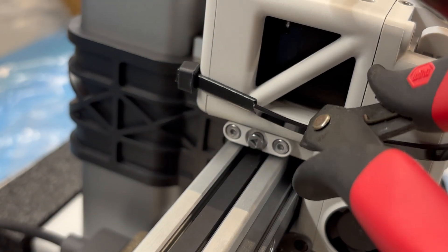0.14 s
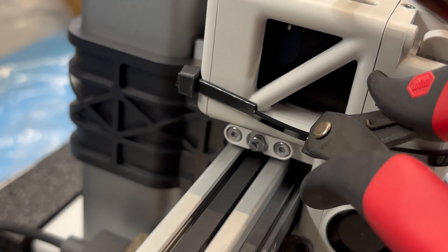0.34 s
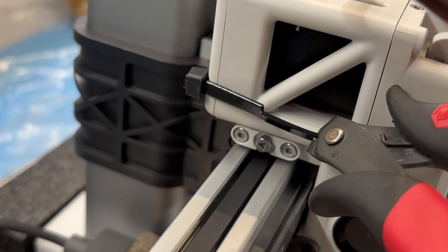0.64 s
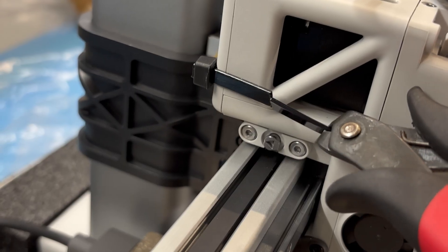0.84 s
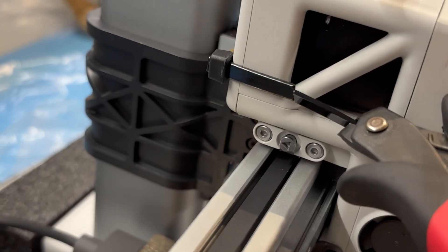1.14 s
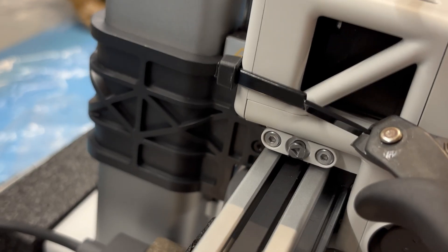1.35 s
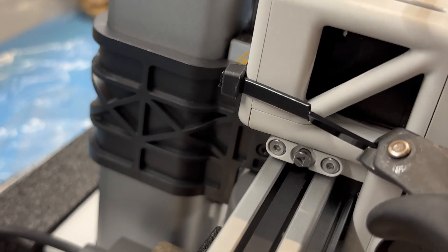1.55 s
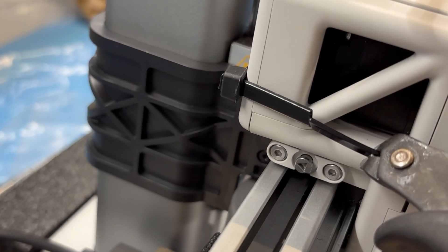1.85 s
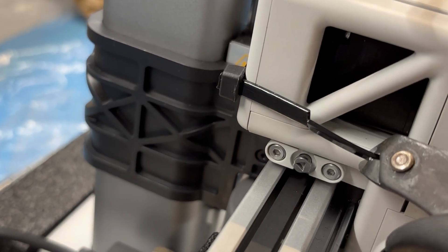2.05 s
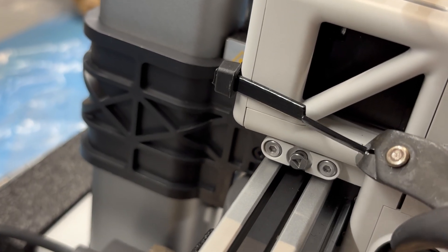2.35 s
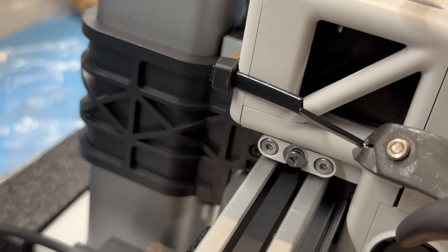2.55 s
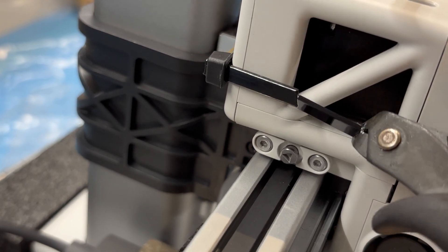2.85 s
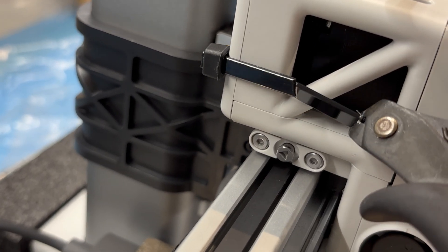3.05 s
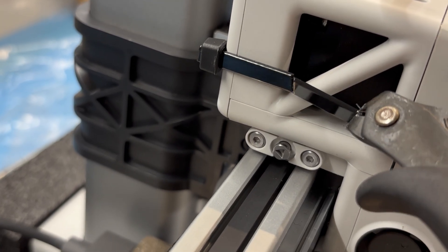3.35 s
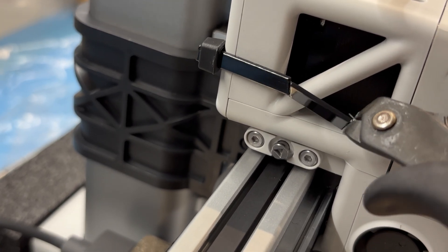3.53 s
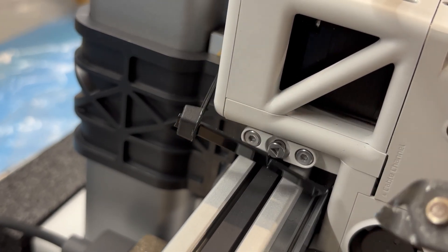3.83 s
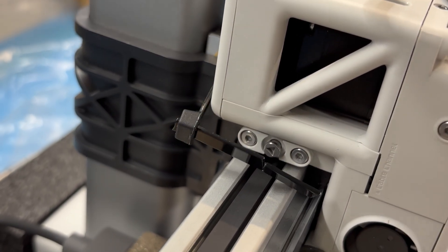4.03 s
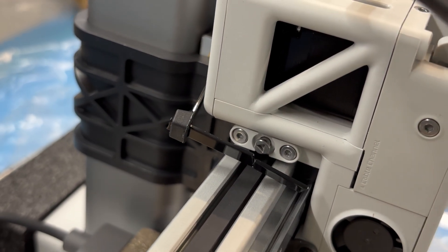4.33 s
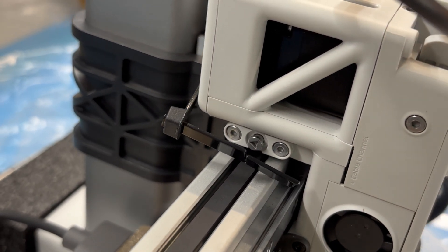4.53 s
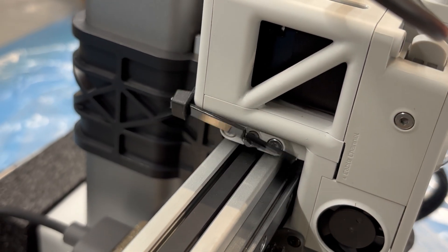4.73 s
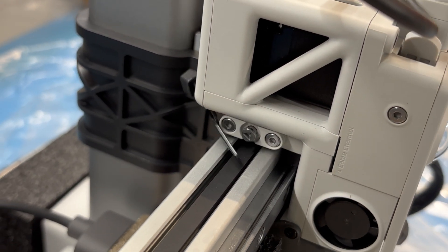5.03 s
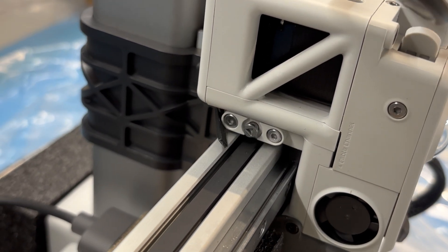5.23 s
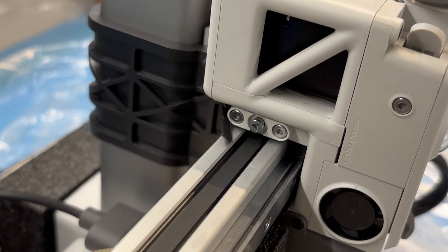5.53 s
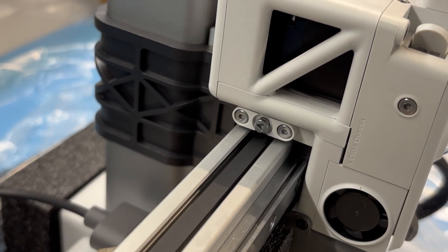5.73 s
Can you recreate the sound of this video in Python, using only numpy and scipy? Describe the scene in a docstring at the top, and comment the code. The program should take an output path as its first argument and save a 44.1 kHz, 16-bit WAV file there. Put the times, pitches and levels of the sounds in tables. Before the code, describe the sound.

A low, steady machine hum with faint fan noise and soft room air runs throughout, indoors and closely miked in stereo. In the first second the deep boom and dull wash of an earlier knock die away, with a faint click near 0.4. Soft rubbery glove rustles come and go, mostly until 2.3. At about 2.37 to 2.4 the cutters bite with a very loud, hard plastic crack, a tight burst of clicks and a short falling thump. A clear click follows at 2.75, then small creaky ticks from 3.0 to 3.3. At 3.57 a second sharp snap lets the tie loose, and it scrapes and rattles until about 3.95. After a quieter gap, light clicks and ticks cluster at 4.6 to 4.9, with a brief bright scrape around 5.0. From 5.5 to 5.8 a dense, loud clatter of snaps, gritty sliding and hollow knocks tails off into hum.

```python
"""A bench in a humming room: side cutters squeeze a nylon cable tie on a plastic frame until it snaps;
the loose tie ticks, scrapes and rattles over the frame and its rail. A rubber glove rustles and the boom
of an earlier knock dies away. Contacts are noise bursts through resonances, jolts are sagging sines,
rubs and slides are gated grainy noise, hum is shaped noise. A close phone microphone pair."""
import sys
import numpy as np
from scipy import signal
from scipy.fft import rfft, irfft, next_fast_len
from scipy.io import wavfile
from scipy.ndimage import map_coordinates

SR = 44100
rng = np.random.default_rng(int(sys.argv[2]) if len(sys.argv) > 2 else 0)


def bounce(signal):
    """Save signal as a 16-bit WAV file at the path given by the first command-line argument."""
    frames = np.transpose(np.atleast_2d(signal))
    limited = np.clip(frames, -1, 1)
    pcm = np.round(limited * 32767).astype(np.int16)
    wavfile.write(sys.argv[1], SR, pcm)


N = 259341

# Drone level: time_s, level_db
DRONE_LEVEL = [(0, -48.5), (.5, -50), (.8, -53), (1.3, -52.5), (1.62, -48), (1.72, -54.5), (2.3, -53.5),
               (2.4, -46), (2.57, -53), (3.3, -50.5), (3.62, -45), (3.88, -52.5), (4.47, -53.5),
               (4.73, -47), (4.85, -54), (5.88, -48)]
# Drone of far machines, relative spectrum: freq_hz, density_db
DRONE_SPECTRUM = [(12, -53), (20, -25), (30, -5.5), (49, -1.5), (65, 6.5), (92, -8), (134, -15.5),
                  (160, -15.5), (210, -47), (350, -120)]
# Narrow bands of fan noise, each resonance applied twice: center_hz, width_hz, gain_per_pass_db
FAN_BANDS = [(925, 140, -6.5), (1300, 120, -0.5), (2330, 390, -14)]
# Room air, relative spectrum: freq_hz, density_db
AIR_SPECTRUM = [(59, -24.5), (100, 3.5), (240, -6), (360, -18), (392, -15.5), (446, -15.5), (628, -18),
                (942, -24), (1030, -29), (1300, -27.5), (2260, -38), (5210, -54.5), (7020, -58),
                (12000, -58), (16500, -54.5)]
# Left-right likeness of air and wash: freq_hz, correlation
LIKENESS = [(60, 1), (130, 0.87), (290, 0.55), (640, 0.32), (1410, 0.041), (3100, 0.22), (6820, -0.011),
            (15000, -0.28)]
# Boom of the room mode, before the closing fade: time_s, level_db
BOOM_LEVEL = [(0, -67.5), (.04, -39.5), (.34, -41), (.42, -58), (.52, -40), (.58, -55), (.68, -46.5),
              (.8, -60), (1, -56)]
# Dull wash after the knock, relative spectrum: freq_hz, density_db
WASH_SPECTRUM = [(88, -33), (150, -8), (287, -31.5), (457, -11), (2540, -24.5), (5830, -35.5), (8000, -61),
                 (10400, -87), (17600, -120)]
# Glove rubs: start_s, length_s, hiss_db, change_over_rub_db, body_re_hiss_db
GLOVE_RUBS = [(0.561, 0.055, -75.5, -2, 4.5), (0.653, 0.28, -71, -7.5, -1.5), (0.981, 0.05, -67, -2, -4.5),
              (1.084, 0.19, -76, 9, 3), (1.357, 0.18, -71, -11.5, 0), (1.629, 0.11, -68.5, -5.5, -2.5),
              (1.808, 0.052, -75.5, 2.5, -8), (2.014, 0.063, -75.5, 8.5, -2), (2.13, 0.034, -67, -7.5, -10),
              (2.209, 0.03, -68, 1, -5), (2.3, 0.16, -86, 13, 8), (2.435, 0.085, -74.5, -13, 2),
              (2.794, 0.11, -74.5, -9, 4), (2.996, 0.11, -79.5, 0, 7), (3.273, 0.093, -77, -14, 3),
              (3.72, 0.039, -74, 5, -8), (3.88, 0.087, -83, 4, -1), (4.016, 0.067, -69, -13, 0),
              (4.205, 0.14, -78.5, 8.5, -4), (4.616, 0.06, -79.5, 8, 7), (5.18, 0.033, -81, -4, 11),
              (5.25, .18, -83, 0, 8), (5.472, 0.058, -73, 16, 1)]
# Rubber on handles, relative spectrum: freq_hz, density_db
RUBBER_SPECTRUM = [(1200, -29), (2000, -2), (3600, -8.5), (6200, 0), (8000, -4.5), (9500, 0.5),
                   (13500, -3.5), (15500, 1), (16500, -18.5)]
# Frame jolts: start_s, level_db, first_hz, last_hz, t60_s
FRAME_JOLTS = [(2.368, -28, 330, 69.4, 0.11), (3.566, -50, 450, 390, 0.064), (3.62, -52.5, 420, 390, 0.15),
               (5.596, -38, 400, 198, 0.058), (5.608, -33, 460, 333, .05), (5.65, -44.5, 400, 340, 0.12),
               (5.73, -41.5, 407, 347, 0.066)]
# Tie slides over the frame: start_s, length_s, level_db, change_over_slide_db, brightness_db
TIE_SLIDES = [(2.4, .12, -61.5, -23, 0), (2.751, 0.089, -66.5, -4, -3), (3.585, 0.16, -47, -15, 0),
              (3.755, 0.218, -70.5, 0.5, -4), (4.723, 0.16, -71.5, 12.5, 3), (4.949, 0.071, -57.5, 7, 8.5),
              (5.036, 0.058, -49.5, -5.5, 0), (5.459, .06, -66, 14, -3), (5.526, 0.037, -61.5, -10.5, -2),
              (5.586, 0.092, -45, -0.5, 6.5), (5.671, 0.17, -43, -21.5, -5)]
# Tie on frame, relative spectrum: freq_hz, density_db
SCRAPE_SPECTRUM = [(320, -39.5), (550, -4.5), (950, -4), (1170, -3), (1600, -9.5), (2350, -4.5), (3600, -9),
                   (4600, -11.5), (6500, -4.5), (8000, -31.5), (9750, -15), (12100, -22.5), (15600, -24),
                   (16500, -54)]
# Contacts: start_s, strap_peak_db, frame_re_strap_db, tick_re_strap_db, strap_hz, frame_hz, t60_s,
# left_minus_right_db (strap only)
CONTACTS = [(0.379, -54, -8, -15, 6350, 610, 0.022, 9.5), (0.4047, -68, 6, 13, 1700, 650, .031, 5),
            (1.8512, -74, -4, 28, 2010, 654, .015, 2), (2.3661, -18, -14.5, -10, 4402, 1030, 0.024, -1),
            (2.3791, -41.5, -8, 8.5, 1900, 596, .031, 12), (2.385, -21.5, -23.5, 9, 3300, 724, 0.0054, 9),
            (2.389, -23, -22, 7.5, 4900, 580, .0083, 13.5), (2.394, -4.5, -39, -3, 4574, 814, .012, -2),
            (2.4066, -39.5, -7, -5.5, 2570, 716, .016, 12.5),
            (2.4206, -44.5, -24, 0, 2320, 1335, .011, 6.5), (2.4615, -56, -12, 7, 2150, 622, 0.023, 2.5),
            (2.7492, -21.5, -20, -4, 4560, 750, 0.018, 1.5), (2.7647, -37, -5, -20, 2420, 1250, 0.029, -5),
            (2.7779, -41.5, 8.5, -25, 1920, 830, .051, 8), (3.0341, -40, 2, -23, 4500, 1190, .024, -0.5),
            (3.0514, -62, 12, -10, 3690, 1130, 0.065, -2), (3.0848, -38.5, -7.5, 0.5, 2130, 865, 0.024, 0),
            (3.2083, -62, -8, -14, 2090, 697, 0.019, -2), (3.24, -63.5, 12.5, -15.5, 3900, 1156, 0.025, -1),
            (3.2688, -55.5, 7.5, -5, 1790, 1065, 0.054, 2), (3.2915, -53.5, 10, 3, 1640, 1170, 0.045, 5),
            (3.4854, -57, -17.5, -30, 3700, 675, 0.017, -6),
            (3.5651, -15.5, -12, 1.5, 5230, 840, 0.035, 1.5), (3.5802, -24, -7.5, -13, 2580, 820, 0.04, 0),
            (3.6172, -33, 3, 15.5, 2416, 1233, .034, 15), (3.6291, -31, -6, -1, 3520, 1220, 0.078, 8),
            (3.6494, -36, 0.5, -2.5, 2110, 780, 0.077, -5.5), (3.6634, -37, -4, 9.5, 1840, 920, 0.018, 15),
            (3.6774, -37, -23, 10, 6160, 907, 0.022, 13), (3.6856, -42.5, -12, -3, 4070, 861, 0.011, 5),
            (3.7023, -34, -10.5, -4, 2710, 1140, .016, 5), (3.7302, -56.5, 2, 14, 2700, 900, 0.049, 23),
            (3.7751, -49.5, -1.5, -0.5, 2720, 750, .041, 4), (3.8196, -35.5, 0, -7, 2600, 838, .038, 3),
            (3.8337, -51, 7, -8, 2550, 736, .025, 0), (3.8511, -39, -13, 22, 6300, 1250, 0.037, 14),
            (3.9262, -57.5, 7, -10, 2470, 789, 0.036, 1.5), (3.9511, -42, -13, -17, 3260, 770, 0.031, -1),
            (4.6002, -53.5, -4, -20, 4500, 643, 0.027, -1), (4.6596, -50.5, -1, 9.5, 3200, 875, 0.036, 9),
            (4.683, -53.5, -2, 6, 4040, 867, 0.022, 4), (4.7268, -33, 0.5, 12, 3730, 820, .053, 7.5),
            (4.745, -33.5, -11.5, 8, 4180, 1240, .075, 5.5), (4.795, -54.5, 8, -8, 3040, 760, 0.075, -2),
            (4.8189, -31.5, -11.5, 0, 3840, 796, 0.026, 3), (4.8245, -36.5, -3, 7.5, 4000, 734, 0.076, -4),
            (4.8373, -39.5, -4.5, -5, 3620, 1300, 0.038, 0),
            (4.8813, -43.5, -25, -30, 4070, 1340, 0.011, 1), (4.969, -40, -11, 3, 2910, 1210, 0.11, 1),
            (5.032, -34.5, -30, 5, 2225, 1300, .029, 9), (5.0428, -37, -1, -4, 2370, 1170, 0.019, 3),
            (5.0868, -53.5, 8, 8, 3500, 775, .041, -4), (5.51, -45.5, -2.5, 3.5, 2720, 780, 0.076, 3.5),
            (5.5676, -15.5, -15.5, 3.5, 3870, 770, .024, 6.5),
            (5.5889, -27, -14, 1.5, 2200, 1270, .042, -13),
            (5.5939, -18, -14.5, 18, 3740, 1090, 0.048, 9.5), (5.6089, -21.5, -4, -4, 2300, 604, 0.053, 5),
            (5.6198, -35.5, 2, 14, 2170, 1130, .027, 11.5), (5.6316, -31, -25, 13.5, 4940, 1250, .027, -14),
            (5.6488, -28.5, -1, 0.5, 1660, 1160, .019, -3.5), (5.6682, -23, -9, 14, 4700, 1070, .019, 8),
            (5.6902, -32.5, -7.5, 10, 6130, 547, 0.13, -2), (5.696, -21.5, -20, 9.5, 3560, 845, 0.025, 1),
            (5.7291, -37.5, 3, 9, 2220, 780, .059, 16), (5.7348, -35.5, 4, -4, 2860, 1080, 0.052, -4),
            (5.7601, -49.5, 11, -6, 4160, 1260, 0.052, 5), (5.7681, -34.5, 5.5, -19.5, 3000, 818, 0.052, 0),
            (5.806, -31.5, -9.5, -10, 2230, 1035, 0.026, 4.5)]
# Strap resonances: center_hz, width_hz, gain_db
STRAP_MODES = [(1900, 1000, 5.5), (2635, 1066, 7.5), (2850, 400, 7), (3620, 340, 2), (4280, 880, 3),
               (5003, 400, 5), (5210, 510, -2), (6300, 1500, 4)]
# Resonances of jaws and tie teeth: center_hz, width_hz, gain_db
TICK_MODES = [(6460, 900, 13), (8200, 270, 0.5), (10053, 2800, 10), (10910, 2400, 1.5), (11900, 2700, 2.5),
              (13400, 1000, -9.5), (14300, 1700, 2.5)]
# Room decay: freq_hz, t60_s
ROOM_T60 = [(300, .5), (2000, 0.38), (6000, 0.17), (15000, 0.19)]
# Port level difference, near sounds: freq_hz, left_minus_right_db
PORT_LEVEL = [(400, -2.5), (900, -6), (1300, -7), (2400, -4), (4600, -5), (6000, 0), (15000, -0.5)]
# Port phase difference, near sounds: freq_hz, left_lead_rad
PORT_LEAD = [(500, -.4), (1300, -.5), (1800, 2), (2400, .1), (3500, -.5), (4700, -.5), (5300, -1.5),
             (6200, -3.9), (7300, -3.1), (8500, -2.3), (10000, -1.3), (12000, -.1), (14000, .9),
             (16000, 1.5)]

AIR_DB, FAN_DB = -52.5, -74.5
WASH_START_DB, WASH_T60_S, WASH_FLOOR_DB = -56, 0.9, -78
RUB_RISE_S, RUB_FALL_S = 0.04, 0.18  # about 60 dB
SLIDE_RISE_S, SLIDE_FALL_S = 0.072, 0.16  # about 60 dB
SPLIT_HZ = 7000  # body below, hiss above
SAG_S, JOLT_RISE_S = 0.008, 0.0012  # time constants
SCUFF_RISE_S = 0.004  # 60 dB up to the blow
TICK_HZ, TICK_SCATTER_OCT, TICK_T60_S = 11300, 0.15, 0.063
BENCH_DB, WALLS_DB = -28.5, -31
TOP_HZ, ROLLOFF_HZ = 17000, 15900


def amp(db):
    """Decibels to amplitude factor."""
    return 10 ** (np.asarray(db) / 20)


def unit(x):
    """Scale to rms 1."""
    return x / np.sqrt(np.mean(x ** 2) + 1e-20)


def crest(x):
    """Scale to peak 1."""
    return x / np.abs(x).max()


def along(points, hz):
    """Interpolate (freq_hz, value) points on a log frequency axis."""
    f, v = np.transpose(points)
    return np.interp(np.log(hz + 1), np.log(f + 1), v)


def curve(rows):
    """Interpolate (time_s, value) rows at every sample."""
    time_s, value = np.transpose(rows)
    return np.interp(np.arange(N) / SR, time_s, value)


def wobble(rate_hz):
    """Smooth random curve, rate_hz knots a second."""
    knots = rng.standard_normal(int(N * rate_hz / SR) + 4)
    return map_coordinates(knots, [np.arange(N) * rate_hz / SR])


def filtered(x, response):
    """Apply a complex frequency response."""
    n = x.shape[-1]
    m = next_fast_len(n + 8192)
    return irfft(rfft(x, m) * response(np.fft.rfftfreq(m, 1 / SR)), m)[..., :n]


def resonances(modes):
    """Causal sum of second-order resonances of alternating sign."""
    def response(f):
        total = 0
        for k, (center_hz, width_hz, gain_db) in enumerate(modes):
            loss = 1j * f * width_hz
            total = total + (-1) ** k * amp(gain_db) * loss / (center_hz ** 2 - f * f + loss)
        return total
    return response


def struck_near(modes, pitch_hz, slope_db_per_oct):
    """The spot struck favours the modes near one pitch."""
    return resonances([(c, w, db - slope_db_per_oct * abs(np.log2(c / pitch_hz))) for c, w, db in modes])


def rush(spectrum, likeness, grain_db=0, grain_hz=300):
    """Stereo noise of rms 1; its level flickers in grains."""
    pair = rng.standard_normal((2, N)) * amp(grain_db * wobble(grain_hz))

    def mid_side(hz):
        angle = np.arccos(np.clip(along(likeness, hz), -1, 1)) / 2  # sets left-right correlation
        return amp(along(spectrum, hz)) * [np.cos(angle), np.sin(angle)]

    mid, side = filtered(pair, mid_side)
    return unit(np.array([mid + side, mid - side]))


def strokes(rows, rise_s, fall_s):
    """Low-band and high-band gains: each stroke swells, drifts in level and dies."""
    t, low, high = np.arange(N) / SR, 0, 0
    for start_s, length_s, level_db, change_db, low_db, high_db in rows:
        end_s = start_s + length_s
        knots_s = [start_s - rise_s, start_s, end_s, end_s + fall_s]
        shape_db = np.interp(t, knots_s, [-60, 0, change_db, change_db - 61], -200, -200)
        low = low + amp(level_db + low_db + shape_db)
        high = high + amp(level_db + high_db + shape_db)
    return low, high


def hum():
    """Low drone of far machines, narrow-band fan noise and slowly wavering room air."""
    drone = amp(curve(DRONE_LEVEL)) * rush(DRONE_SPECTRUM, [(40, 1.0), (130, 0.9)])
    fan_noise = rng.standard_normal((2, N))
    fan = amp(FAN_DB) * unit(filtered(fan_noise, lambda f: resonances(FAN_BANDS)(f) ** 2))
    air = amp(AIR_DB + 1.08 * wobble(6)) * rush(AIR_SPECTRUM, LIKENESS)
    return drone + fan + air


def knock_tail():
    """A room mode, a phase-wobbled sine, still booms while a dull noise wash dies away."""
    t = np.arange(N) / SR
    mode = np.sqrt(2) * np.sin(2 * np.pi * 54 * t + 1.34 * wobble(11.06))
    wash_gain = amp(WASH_START_DB - 60 * t / WASH_T60_S) + amp(WASH_FLOOR_DB)
    fade = np.clip((1 - t) / 0.2, 0, 1)  # silent from 1 s
    return fade * (amp(curve(BOOM_LEVEL)) * mode + wash_gain * rush(WASH_SPECTRUM, LIKENESS))


def glove():
    """Rubber fingers rustle on the handles: grainy hiss, with its own body level below it."""
    rustle = rush(RUBBER_SPECTRUM, [(4000, 0.84), (9000, 1.0)], grain_db=2.0, grain_hz=52)
    body = filtered(rustle, lambda hz: hz < SPLIT_HZ)
    low, high = strokes([(*row, 0) for row in GLOVE_RUBS], RUB_RISE_S, RUB_FALL_S)
    return low * body + high * (rustle - body)


def thumps():
    """Dull low rings whose pitch settles as the frame does, each with a puff of low noise."""
    out, t = np.zeros(N + SR), np.arange(SR // 5) / SR
    for start_s, level_db, first_hz, last_hz, t60_s in FRAME_JOLTS:
        cycles = last_hz * t + (first_hz - last_hz) * SAG_S * (1 - np.exp(-t / SAG_S))
        low_band = resonances([(last_hz, 0.8 * last_hz, 0)])
        puff = unit(filtered(rng.standard_normal(len(t)), lambda f: low_band(f) ** 2))
        ring = np.sin(2 * np.pi * cycles) + 0.25 * puff
        envelope = amp(level_db - 60 * t / t60_s) * (1 - np.exp(-t / JOLT_RISE_S))
        out[round(start_s * SR):][:len(t)] += envelope * ring
    return out[:N]


def drag():
    """The ribbed tie slides as gritty noise; each slide has its own brightness."""
    grit = rush(SCRAPE_SPECTRUM, [(700, 0.85), (9000, 0.98)], grain_db=3.3, grain_hz=280)
    dull = filtered(grit, lambda hz: hz < SPLIT_HZ)
    rows = [(*row, 0, bright_db) for *row, bright_db in TIE_SLIDES]
    low, high = strokes(rows, SLIDE_RISE_S, SLIDE_FALL_S)
    return low * dull + high * (grit - dull)


def clicks():
    """Each contact is a blow in a burst of tiny impacts; it rings strap, jaws and hollow frame."""
    lead = SR // 50
    out, t = np.zeros((2, N + SR)), (np.arange(SR // 7) - lead) / SR
    hollow = resonances([(460, 410, 0), (900, 680, 0.0014)])  # broad body of the frame
    for start_s, strap_db, frame_db, tick_db, strap_hz, frame_hz, t60_s, pan_db in CONTACTS:
        tick_hz = TICK_HZ * 2 ** (TICK_SCATTER_OCT * rng.standard_normal())
        # scuffing swells up to the blow and dies after it
        decay_db = -60 * t / np.clip(t60_s, 0.003, 0.2)
        shape = amp(np.where(t < 0, 60 * t / SCUFF_RISE_S, decay_db))
        burst = rng.standard_normal((3, len(t))) * shape + 5 * (t == 0)

        strap = crest(filtered(burst[0], struck_near(STRAP_MODES, strap_hz, 8)))
        short_burst = burst[1] * amp(-60 * np.abs(t) / TICK_T60_S)  # small hard parts stop first
        tick = crest(filtered(short_burst, struck_near(TICK_MODES, tick_hz, 21.5)))
        note = resonances([(frame_hz, 210, 0)])
        frame = crest(filtered(burst[2], lambda f: note(f) ** 2 + 0.18 * hollow(f)))

        contact = amp(strap_db) * strap * amp([[pan_db / 2], [-pan_db / 2]])
        contact = contact + amp(strap_db + frame_db) * frame + amp(strap_db + tick_db) * tick
        first = round(start_s * SR) - lead + 30  # blow lands 30 samples after start_s
        out[:, first:][:, :len(t)] += contact
    return out[:, :N]


def room(x):
    """Three delayed noise-tail answers, each frequency dying at its own speed."""
    hz, t, z = signal.stft(rng.standard_normal((3, SR // 2)), SR, nperseg=256)
    decay = amp(-60 * t / along(ROOM_T60, hz)[:, None])
    tail = signal.istft(z * decay, SR, nperseg=256)[1]
    delayed = np.pad(x.mean(0), (300, 0))[None]
    return signal.fftconvolve(delayed, tail / np.linalg.norm(tail[0]), axes=1)[:, :N]


def ports(x):
    """A near sound reaches the two microphone ports with unlike level and phase."""
    half = np.array([[0.5], [-0.5]])
    return filtered(x, lambda hz: amp(along(PORT_LEVEL, hz) * half) * np.exp(1j * along(PORT_LEAD, hz) * half))


def scene():
    """Sum near sounds, room answers, jolts and background."""
    tie = clicks() + drag()
    bench, *walls = room(tie)  # bench answers from the same side, walls from all round
    near = ports(tie + glove() + amp(BENCH_DB) * bench)
    far = amp(WALLS_DB) * np.array(walls)
    jolts = thumps() * amp([[-1.2], [1.2]])
    return near + far + jolts + hum() + knock_tail()


def record(dry):
    """The microphones fade at the very top; nothing is kept from TOP_HZ up."""
    return filtered(dry, lambda hz: (hz < TOP_HZ) / np.sqrt(1 + (hz / ROLLOFF_HZ) ** 40))


dry = scene()
out = record(dry)
bounce(out)
```